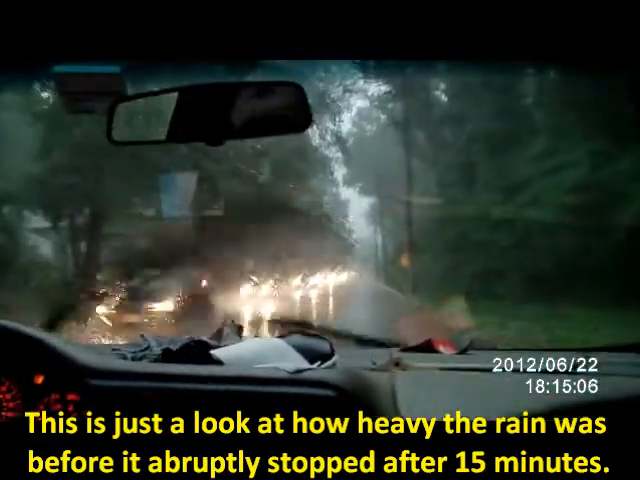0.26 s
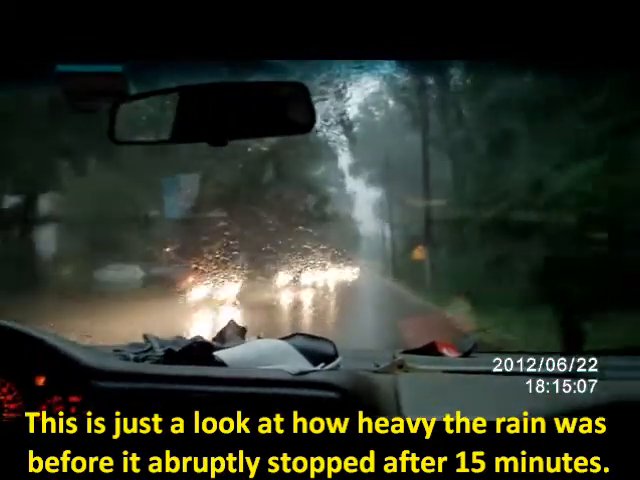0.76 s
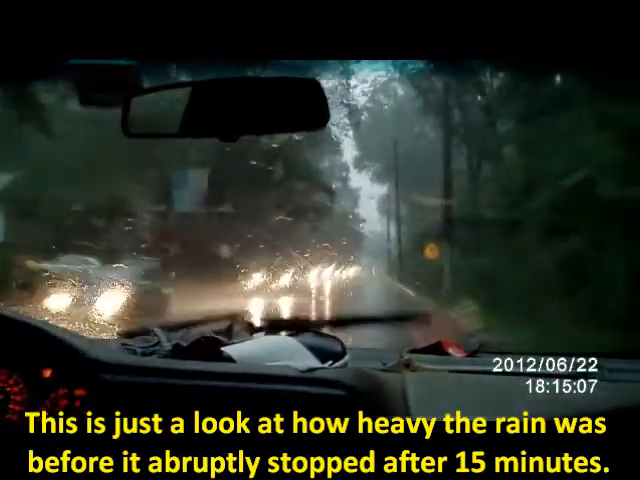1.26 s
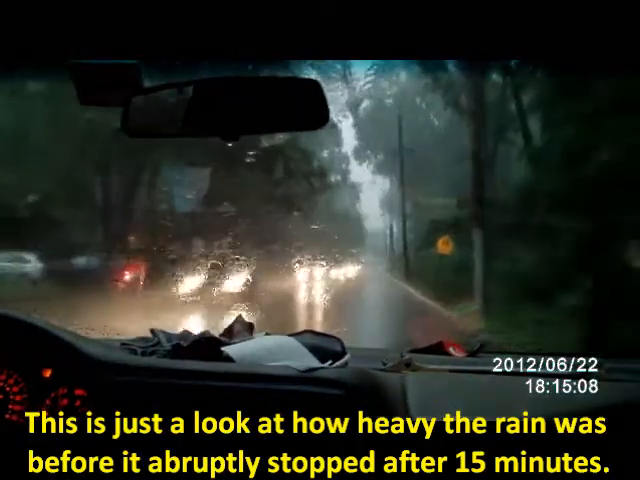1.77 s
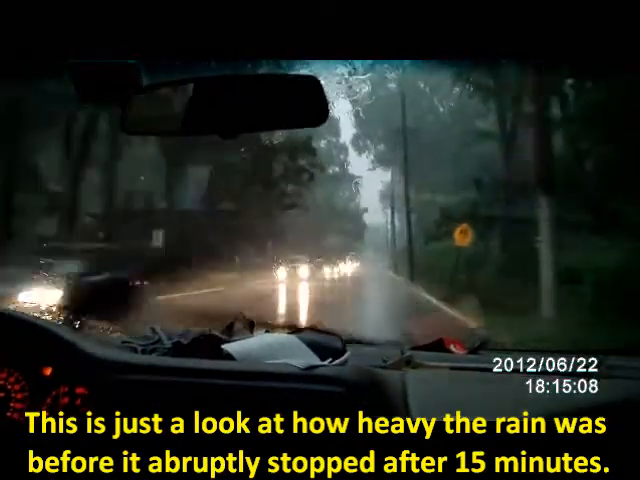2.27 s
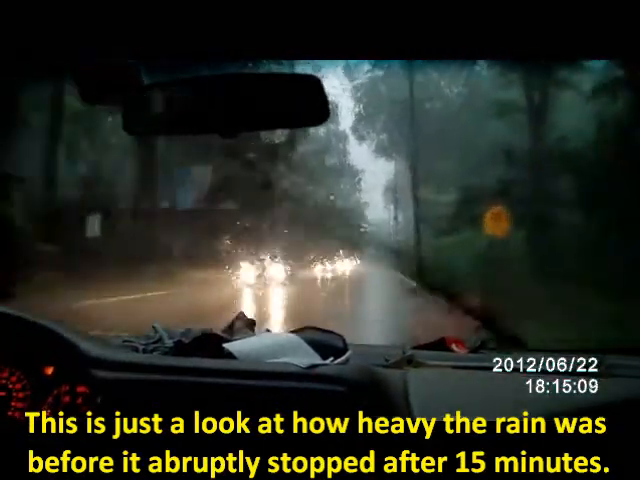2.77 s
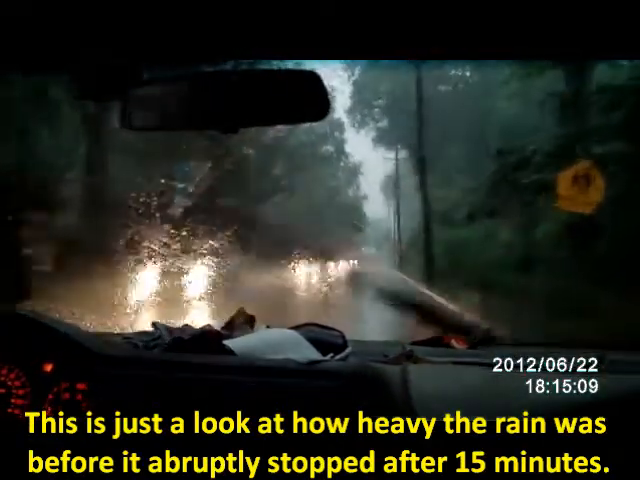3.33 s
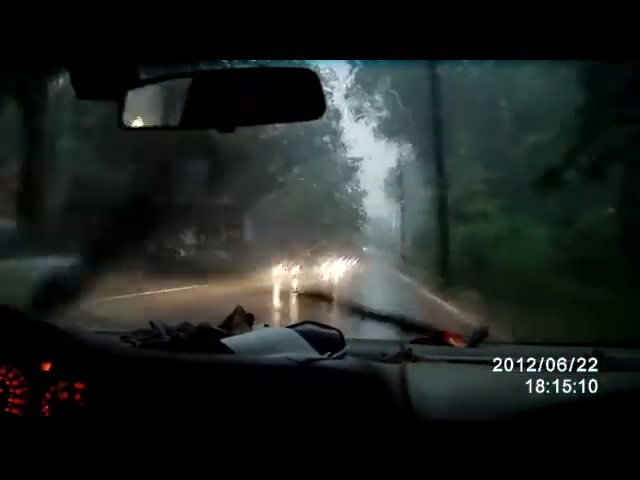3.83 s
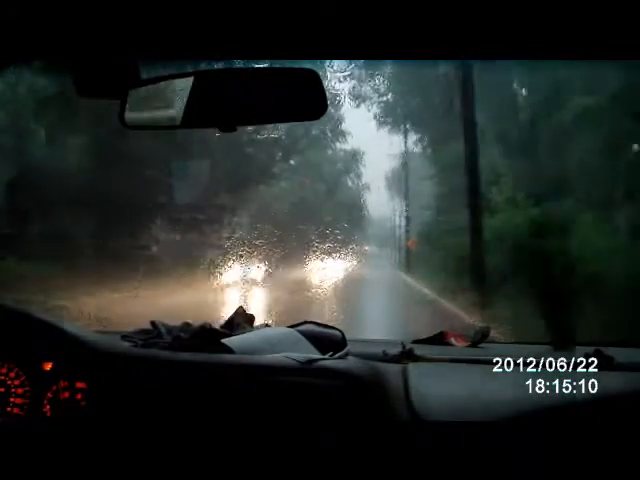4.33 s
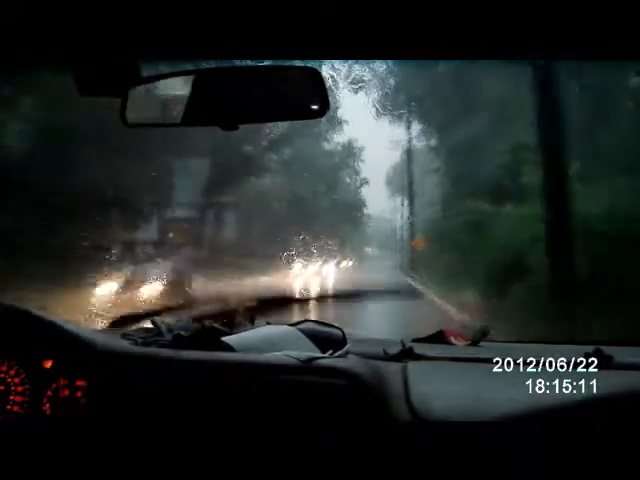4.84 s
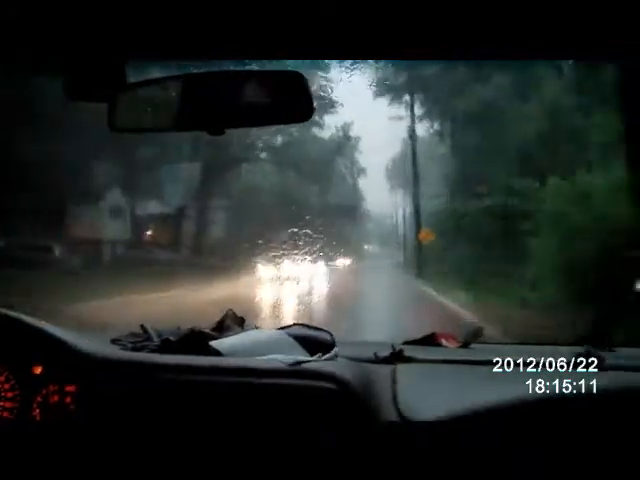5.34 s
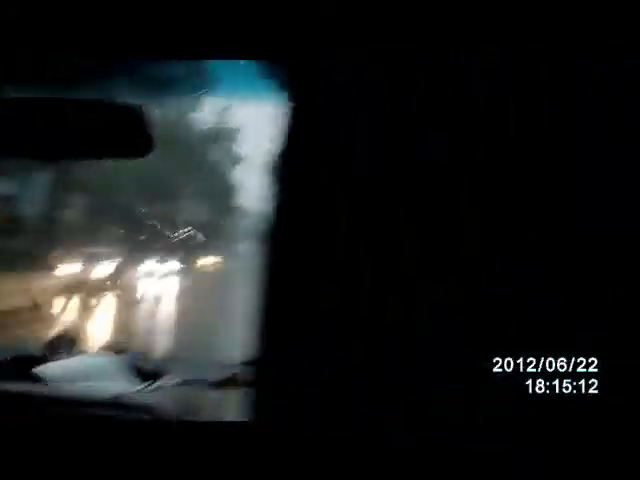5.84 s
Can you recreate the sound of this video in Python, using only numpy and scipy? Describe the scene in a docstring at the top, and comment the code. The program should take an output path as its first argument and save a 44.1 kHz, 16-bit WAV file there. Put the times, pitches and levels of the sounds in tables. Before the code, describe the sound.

Heavy rain drums on a car roof and crackles across the windscreen in dense bright taps, heard from inside the small cabin over a faint rumble.

```python
"""Heavy rain on a car

Heard by one microphone inside the cabin: a low, lumpy rumble of the car body on the wet road lies underneath.
Countless drops drum dully on the lined roof as patchy noise; fine spray hisses in uneven gusts through the glass.
Drops on the windscreen tap brighter and come in flurries, each tap a tick that sweeps down from the treble.
The largest stand out one by one, with a few dull thuds on the roof; the small cabin smears each tap."""
import sys
import numpy as np
from scipy import signal
from scipy.fft import rfft, irfft
from scipy.io import wavfile
from scipy.ndimage import uniform_filter1d

SR = 44100
rng = np.random.default_rng(int(sys.argv[2]) if len(sys.argv) > 2 else 0)


def log_audio(samples):
    """Write samples as a 16-bit WAV file to the path given in sys.argv[1]."""
    # one column per channel
    frames = np.atleast_2d(samples).T
    # limit to full scale, then quantise
    limited = np.clip(frames, -1, 1)
    pcm = np.round(limited * 32767).astype(np.int16)
    wavfile.write(sys.argv[1], SR, pcm)


N = 269010  # length in samples

# Road and body rumble, relative spectrum: pitch_hz, level_db (per Hz)
RUMBLE_COLOUR = [(20, -4), (60, -5), (120, -2), (200, 3.5), (400, -26)]
# Rumble level over time, before its lumps: start_s, level_db
RUMBLE_LEVEL = [(0.0, -75), (3.0, -78), (4.5, -85), (4.8, -67.5), (5.1, -80.5), (5.5, -72), (6.1, -75)]
# Rain swelling slowly, with short lulls on the glass: start_s, roof_level_db, windscreen_level_db
RAIN_LEVEL = [(0.0, -53.5, -53), (0.25, -52.5, -52), (0.5, -51.5, -52.5), (0.57, -53, -59.5),
              (0.64, -55, -54.5), (0.75, -51.5, -52.5), (0.88, -51.5, -51.5), (1.1, -51.5, -50),
              (1.55, -51, -50), (1.68, -53, -55), (1.8, -50.5, -52.5), (2.2, -52.5, -51.5),
              (2.42, -50.5, -48), (2.65, -50.5, -52), (3.15, -49, -52), (3.3, -51, -48.5), (3.9, -48, -53),
              (4.02, -47.5, -56.5), (4.1, -49, -52), (4.3, -47, -54), (4.42, -50.5, -56),
              (4.55, -50.5, -47.5), (4.66, -53, -52), (4.78, -51, -49), (4.89, -54, -52),
              (4.94, -50, -60.5), (4.99, -52, -53), (5.05, -52.5, -51), (5.2, -48.5, -53.5),
              (5.49, -51, -55), (5.6, -52, -49), (5.8, -51, -48), (6.1, -48.5, -50.5)]
# Roof drumming, relative spectrum: pitch_hz, level_db (per Hz)
ROOF_COLOUR = [(20, -31), (100, -20), (170, -22), (250, -6), (400, -4.5), (465, 0.5), (560, -1), (850, 1),
               (1300, -0.5), (2000, -5), (4000, -16.5), (13000, -52.5)]
# Windscreen, relative spectrum: pitch_hz, level_db (per Hz)
GLASS_COLOUR = [(300, -30), (900, -4), (1600, -5), (2100, -2.5), (3000, -0.5), (4200, -4.5), (6000, -10.5),
                (9000, -18), (12000, -27.5), (13000, -34), (14000, -48)]
# Cabin ring, decay by band: pitch_hz, t60_s
CABIN_DECAY = [(500, 0.053), (1500, 0.15), (3500, 0.041), (9000, 0.08)]
# Heavy drops on the roof: start_s, peak_db, thud_centre_hz
ROOF_THUDS = [(0.06, -43, 937), (1.116, -38.5, 1410), (2.431, -39, 1200), (2.934, -46, 990),
              (3.107, -40, 802), (3.969, -39, 1150), (4.675, -60, 110), (4.747, -39, 1020),
              (4.8, -52.5, 260), (4.947, -42, 704), (5.087, -42.5, 1230), (5.167, -37.5, 1450),
              (6.022, -34, 1274), (6.036, -38, 1040)]
# Large drops on the glass: peak_s, peak_db, splat_centre_hz, treble_db (per octave, 4 to 8 kHz), ring_db
LARGE_DROPS = [(0.0204, -53, 2850, -12, -12), (0.051, -38.5, 2930, -5, 2), (0.065, -36.5, 2670, 0, 2),
               (0.1715, -38, 2860, -13, -12), (0.2015, -36.5, 2810, -14, -12), (0.2316, -39, 2840, -9, -1),
               (0.241, -37, 3000, 0, -3), (0.2639, -33, 3240, 2, 1.5), (0.3114, -38, 2610, -2, -4),
               (0.3504, -43, 4050, 7, -12), (0.3895, -44, 3410, 7, 1), (0.3954, -37.5, 3700, 2, 1),
               (0.4257, -38, 2860, -14, -12), (0.4525, -42, 4100, 6, -1), (0.4729, -37, 3250, -3, -2),
               (0.6064, -38, 3280, -3, -1), (0.6146, -38, 2420, -3, -12), (0.6457, -42, 2850, -16, 1),
               (0.667, -42, 3110, -3, -6), (0.6787, -42, 2940, -7, -9), (0.7353, -39.5, 2940, -3, 1),
               (0.8794, -34, 3710, -8, -7), (0.8865, -40, 3110, -9, -3), (0.9009, -32.5, 4020, -5, -8),
               (0.928, -39, 3430, 2, 2), (0.9707, -35, 2620, 3, -10), (1.0177, -41, 3310, 9, -14),
               (1.09, -40, 3430, -4, -12), (1.1402, -39, 2060, 3, 3), (1.1507, -43, 4700, 8, 3),
               (1.3522, -38, 3360, -4, -1), (1.6071, -41, 2270, -14, -12), (1.6217, -38, 3430, -11, 4),
               (1.6283, -44, 2790, -9, -14), (1.6517, -42, 2570, -13, 3), (1.7093, -39.5, 3850, 1, 3),
               (1.7366, -43, 2550, -12, -9), (1.751, -40, 2580, -13, 0), (1.7966, -38, 3050, -9, 1),
               (1.8106, -29.5, 3380, -3.5, -2), (1.8885, -31.5, 3290, 1, -9), (1.913, -40, 2880, -4, -7),
               (1.9485, -32.5, 2800, 3, -10), (1.9746, -32, 3410, -6, 3), (1.9859, -39, 3020, 6, -4),
               (2.0306, -29.5, 3220, -4, -12), (2.0543, -40, 3280, -13, 1), (2.063, -35, 3600, 2, 1),
               (2.0905, -31, 3250, -4, 1), (2.1144, -35, 3830, -10, -12), (2.1799, -36.5, 4410, -1, 1),
               (2.191, -37, 2770, -11, -10), (2.2497, -41, 2600, 1, 10), (2.3846, -36, 2630, -7, 2),
               (2.3945, -35, 3450, -3, -4), (2.4245, -36, 3170, 0, 2), (2.49, -43, 3320, -5, -6),
               (2.503, -37, 4060, 3, -8), (2.5472, -33, 3170, -1, 4), (2.573, -30.5, 2900, 0, 3),
               (2.597, -37, 3090, -13, -12), (2.6395, -26, 3270, -2, -2), (2.706, -34, 3320, -2, 0),
               (2.7178, -34.5, 3500, -8, 1), (2.746, -36.5, 3780, -4, -2), (2.7827, -29.5, 3470, -3, -4),
               (2.8305, -33, 3340, -11, -2), (2.8565, -37.5, 2710, 7, 3), (2.8666, -41, 3010, 8, 3),
               (2.8751, -35, 2890, -7, 0), (2.889, -34.5, 3340, -2, 0), (2.9402, -31.5, 2430, -9, -10),
               (2.971, -35.5, 4150, 9, -14), (3.0029, -36.5, 3270, -5, 0), (3.0412, -32, 3270, -3, 0),
               (3.0536, -33, 3260, 0, 0), (3.0603, -31, 3330, -3, -9), (3.0795, -34.5, 3470, -5, 3),
               (3.171, -48, 2860, 2, -8), (3.2147, -39, 4360, -2, -4), (3.221, -34, 3200, 3, 0),
               (3.2523, -34, 2870, -2, 2), (3.2885, -36, 2940, 1, 5), (3.32, -31, 3080, -10, -10),
               (3.3283, -38, 3860, 11, -14), (3.4035, -37, 3060, -16, -9), (3.4326, -35, 3070, -2, -4),
               (3.4559, -33.5, 3180, -2, -8), (3.5002, -33.5, 2560, -14, 2), (3.5201, -48, 3350, 6, -10),
               (3.5386, -39, 3470, 0, -14), (3.5817, -34, 3430, -3, 4), (3.5887, -36, 3270, 2, 3),
               (3.611, -34, 2820, -5, 5), (3.6362, -35, 4210, -2, 3), (3.6852, -36, 3460, -16, -2),
               (3.7089, -28, 3840, -4, -4), (3.7213, -33, 3350, -6, -6), (3.7296, -36, 3160, 3, -3),
               (3.7453, -36, 3130, 2, 4), (3.7967, -32.5, 3850, -2, 1), (3.822, -37.5, 3560, -3, -1),
               (3.8332, -32.5, 3810, -12, -12), (3.8608, -34, 2670, -3, -12), (3.8744, -31, 3850, -7, -1),
               (3.8896, -32, 3320, -1, 1), (3.9571, -32.5, 3240, -3, -1), (3.9697, -33, 2440, -6, 4),
               (3.9824, -34, 3200, 1, 2), (3.992, -33, 2810, -9, -4), (4.0541, -38, 2890, 3, 1),
               (4.0656, -38, 2600, 3, 2), (4.0873, -35, 3010, 5, 4), (4.1327, -34, 3390, 0, 2.5),
               (4.143, -35, 3210, -10, -4), (4.1774, -46, 3160, 8, -12), (4.1933, -33.5, 4190, 0, 2),
               (4.203, -32, 4130, -2, 6), (4.263, -33, 2490, -2, 6), (4.2707, -36, 3070, -10, 2),
               (4.2761, -33, 3660, -3, 3), (4.2866, -34, 3240, -6, -2), (4.307, -34.5, 2230, -12, 2),
               (4.3346, -40, 2890, 4, -7), (4.3765, -36.5, 2090, -6, 3), (4.389, -36, 3560, 7, -3),
               (4.4232, -33, 4020, 1, -5), (4.4441, -35, 2920, -8, -17), (4.46, -35, 3720, -1, -5),
               (4.4683, -37, 3080, -3, -12), (4.5253, -39, 3380, 1, 1), (4.5336, -39, 2980, 0, -2),
               (4.5661, -36, 2880, 0, -10), (4.6891, -39, 3310, 3, -8), (4.7022, -34, 2380, -5, -7),
               (4.7316, -34, 3260, 0, 1), (4.7444, -33, 3750, 1, -3), (4.7508, -30, 3990, -1, -2),
               (4.7608, -33, 2290, -17, -3), (4.7695, -35, 3520, -9, -9), (4.7903, -34, 4020, 1, -14),
               (4.8156, -35, 3360, -11, 0), (4.8368, -34, 3030, -16, -5), (4.842, -35, 2950, -11, -15),
               (4.857, -40.5, 2420, -5, 12), (4.8628, -35, 2930, -10, -12), (4.9643, -42, 2940, 3, 0),
               (4.9986, -37, 3370, 0, 1), (5.011, -42, 3750, -1, -3), (5.0208, -42, 2510, -2, 3),
               (5.0303, -39, 2950, -7, -3), (5.0624, -40, 4170, 6, -6), (5.0755, -36.5, 2790, -4, 2),
               (5.085, -33, 3510, 2, 0), (5.1067, -40, 3660, -12, 4), (5.117, -33.5, 3710, 2, 2),
               (5.1722, -32, 2380, 1, -1), (5.2029, -29.5, 3300, 4.5, -5), (5.2608, -33, 3360, -7, 0),
               (5.266, -37.5, 3600, -10, 0), (5.2706, -39.5, 2860, -5, -3), (5.2871, -36, 3820, 2, -6),
               (5.334, -36, 2920, 1, -12), (5.3467, -39, 4060, 0, 1), (5.3532, -34, 3910, -1, -6),
               (5.3717, -35, 3350, -3, -2), (5.4335, -41.5, 2780, 5, 7), (5.4384, -40, 3330, -9, 0),
               (5.445, -40, 3490, 0, -6), (5.5361, -32, 3740, -8, -2), (5.5582, -34, 3170, -2, -2),
               (5.634, -50, 3340, -7, -12), (5.7177, -36, 3630, 2, 4), (5.802, -30.5, 4260, -3, -5),
               (6.032, -38, 3970, 8, 4)]

LUMPS_DB, LUMP_S = 2, 0.056  # unevenness of the rumble
PATCH_DB, DRUM_DB, DRUM_S = 0.48, 0.89, 0.042  # unevenness of the roof: patches, then the whole drumming
SPRAY_DB, GUST_DB, GUST_S = -7.5, 2.3, 0.036  # spray against the rain level, and its uneven gusts
THUD_S = 0.0076  # a thud's swell peaks after half of this
LEAD_S = 0.0007  # the treble of a large drop arrives this long before its peak
TREBLE_NOISE_DB, EDGE_HZ = -82.5, 13500  # treble noise before the band limit; band limit


def gain_of(db):
    """Decibels to amplitude."""
    return 10 ** (np.asarray(db) / 20)


def evened(x):
    """Scales a signal to rms 1."""
    return x / np.sqrt(np.mean(x ** 2) + 1e-20)


def read(points, hz):
    """Reads a table between its points on a log frequency scale."""
    f, value = np.transpose(points)
    return np.interp(np.log(hz + 1), np.log(f + 1), value)


def over_time(seconds, values):
    """Draws straight lines between timed values, one value per sample."""
    return np.interp(np.arange(N) / SR, seconds, values)


def coloured(x, db):
    """Zero-delay filter; db is a function of frequency."""
    hz = np.fft.rfftfreq(len(x), 1 / SR)
    return irfft(rfft(x) * gain_of(db(hz)), len(x))


def wander(seconds):
    """Slow random drift of rms 1: noise averaged twice over the given time."""
    size = max(round(seconds * SR), 2)
    smooth = uniform_filter1d(rng.standard_normal(N), size)
    return evened(uniform_filter1d(smooth, size))


def rain_gain(column):
    """Amplitude of the rain at every sample: column 1 is the roof, 2 the windscreen."""
    columns = np.transpose(RAIN_LEVEL)
    return gain_of(over_time(columns[0], columns[column]))


def add(mix, s, db, sound):
    """Places a sound with the given peak level."""
    at = round(s * SR)
    mix[at:at + len(sound)] += gain_of(db) * sound / abs(sound).max()


def rumble():
    """Low, lumpy roar of the car body on the wet road: coloured noise with a drifting level."""
    roar = evened(coloured(rng.standard_normal(N), lambda f: read(RUMBLE_COLOUR, f)))
    level_db = over_time(*np.transpose(RUMBLE_LEVEL)) + LUMPS_DB * wander(LUMP_S)
    return gain_of(level_db) * roar


def roof():
    """Dense thuds on the lined roof blend into a roar, patchy in both time and frequency."""
    frames, hz = N // 256 + 5, np.fft.rfftfreq(1024, 1 / SR)
    real, imag, patches = rng.standard_normal((frames, 513, 3)).T
    patches = uniform_filter1d(patches, 10, axis=0)  # across frequency
    patches = evened(uniform_filter1d(patches, 8, axis=1))  # across time
    colour_db = read(ROOF_COLOUR, hz)[:, None] + PATCH_DB * patches
    roar = signal.istft((real + 1j * imag) * gain_of(colour_db), nperseg=1024, noverlap=768)[1][:N]
    return gain_of(DRUM_DB * wander(DRUM_S)) * rain_gain(1) * evened(roar)


def spray():
    """Droplets too dense to tell apart: a gusty hiss through the pane, brighter than the drops."""
    hiss = coloured(rng.standard_normal(N), lambda f: read(GLASS_COLOUR, f) + 2.0 * np.log2((f + 1) / 3000))
    rain = rain_gain(2) ** 0.7 * rain_gain(1) ** 0.3  # dips less than the patter in lulls
    return gain_of(SPRAY_DB + GUST_DB * wander(GUST_S)) * rain * evened(hiss)


def cabin():
    """Sparse reflections of random sign from one spot, each band dying at its own speed, energy 1."""
    taps = np.zeros(2048)
    at = np.arange(20, 2030, 12)
    taps[at + rng.integers(0, 12, len(at))] = rng.choice([-1., 1.], len(at))
    hz, t, bands = signal.stft(taps, SR, nperseg=128)
    decay_db = -60 * t / read(CABIN_DECAY, hz)[:, None]
    tail = signal.istft(bands * gain_of(decay_db), SR, nperseg=128)[1]
    return tail / np.linalg.norm(tail)


def splat(hz, ring_db, treble_db, lift_db, spread, scatter=0.000383, thin_db=0):
    """A drop strikes the pane: bending waves carry the treble first, so the tick sweeps down; the cabin rings.

    spread and scatter are in seconds; the tick is delayed 256 samples to leave room for its start."""
    f = np.fft.rfftfreq(2048, 1 / SR)
    db = read(GLASS_COLOUR, f)
    db += lift_db * np.exp(-(np.log2((f + 1) / hz) / 0.56) ** 2)
    db += treble_db * np.clip(np.log2((f + 1) / 4000), 0, 1)
    # each spot of glass favours other bands
    db += 2.5 * evened(uniform_filter1d(rng.standard_normal(len(f)), size=30))
    db += thin_db * np.clip(np.log2(2300 / (f + 1)), 0, 2)  # body under the tick
    # the water breaks up: bands lead or lag
    late = scatter * evened(uniform_filter1d(rng.standard_normal(len(f)), size=12))
    # phase in turns; its slope is the delay, growing as 1 / sqrt(f) towards the bass
    turns = spread * (2 * np.sqrt(3000 * f) - .5 * f) + 256 * f / SR
    turns += np.cumsum(late) * f[1] + rng.random()
    tick = irfft(gain_of(db) * np.exp(-2j * np.pi * turns))
    ring = signal.fftconvolve(tick, cabin())[:len(tick)]
    return (tick + gain_of(ring_db) * ring) / np.linalg.norm(tick)


def patter(per_s, spread_db, flurry_db):
    """Random drops of many sizes, each on one of many spots of glass; flurries swell them together."""
    size_db = spread_db * np.minimum(rng.exponential(1, N), 3.5)
    size = gain_of(size_db) * (rng.random(N) < per_s / SR)
    fat_db = 10.5 + 2.0 * rng.standard_normal(N)
    size += gain_of(fat_db) * (rng.random(N) < 70 / SR)  # about 70 fat drops a second
    spots_hz = np.geomspace(1600, 6500, num=120)
    spot, out = rng.integers(0, len(spots_hz), N), np.zeros(N)
    for k, hz in enumerate(spots_hz):
        spread = rng.uniform(0.000417, .0025)
        tap = splat(hz, ring_db=-2.5, treble_db=0.0, lift_db=7.5, spread=spread)
        out += signal.oaconvolve(size * (spot == k), tap)[256:N + 256]
    return rain_gain(2) * evened(out * gain_of(flurry_db * wander(0.019)))


def thud(centre_hz):
    """A drop dulled by the roof lining: noise that swells fast and dies, in a band around its centre."""
    u = np.clip(np.arange(-256, 1792) / SR / THUD_S, 0, None)  # starts 256 samples in
    swell = u * np.exp(-2 * u)
    return coloured(swell * rng.standard_normal(len(u)), lambda f: -28 * np.log2((f + 1) / centre_hz) ** 2)


def large_drops():
    """The drops that stand out: bright ones on the glass, dull ones through the roof lining."""
    out = np.zeros(N + 4096)
    for s, db, hz, treble_db, ring_db in LARGE_DROPS:
        drop = splat(hz, ring_db, treble_db, lift_db=2, spread=0.001401, scatter=0.00075, thin_db=-1)
        add(out, s - LEAD_S, db, drop)
    for s, db, hz in ROOF_THUDS:
        add(out, s, db, thud(hz))
    return out[256:N + 256]  # takes back the 256 samples of room


def scene():
    """Stacks rumble, roof, spray, patter and large drops, the same in both channels."""
    background = rumble() + roof() + spray()
    taps = patter(per_s=1700, spread_db=3.5, flurry_db=1.2) + large_drops()
    return np.tile(background + taps, (2, 1))


def record(dry):
    """Very faint treble noise, drawn separately for left and right, joins the sound before the band limit."""
    noise = np.diff(rng.standard_normal((N + 2, 2)).T, n=2)  # differencing twice tilts it to the treble
    mixed = dry + gain_of(TREBLE_NOISE_DB) * evened(noise)
    lowpass = signal.firwin(255, EDGE_HZ, window=("kaiser", 9), fs=SR)
    return signal.oaconvolve(mixed, lowpass[None], "same")


dry = scene()
out = record(dry)
log_audio(out)
```